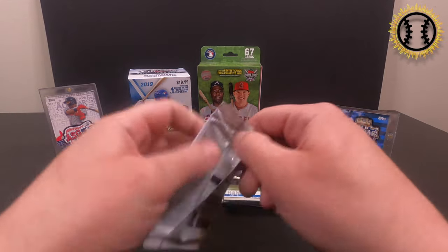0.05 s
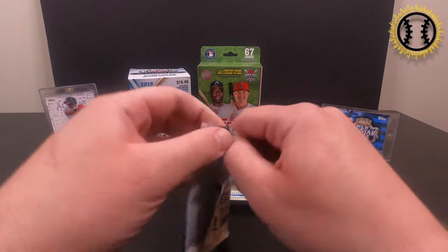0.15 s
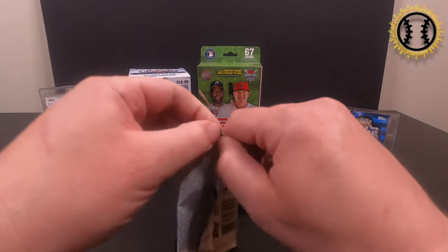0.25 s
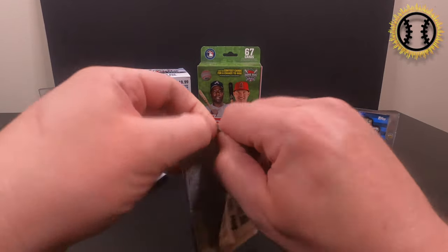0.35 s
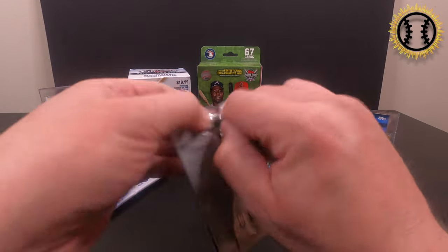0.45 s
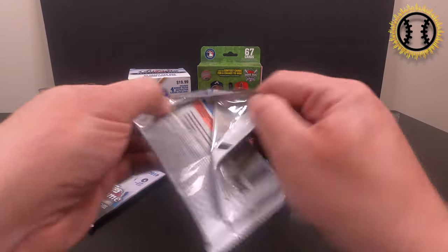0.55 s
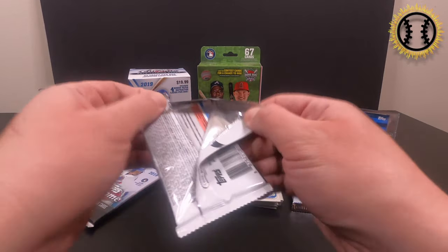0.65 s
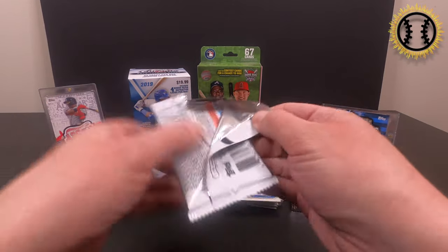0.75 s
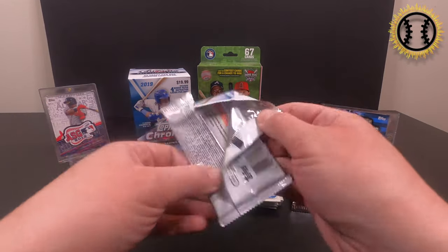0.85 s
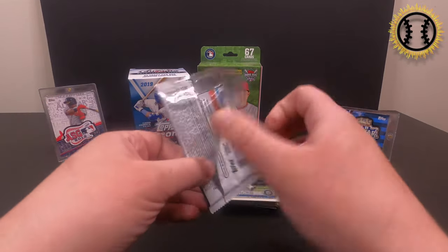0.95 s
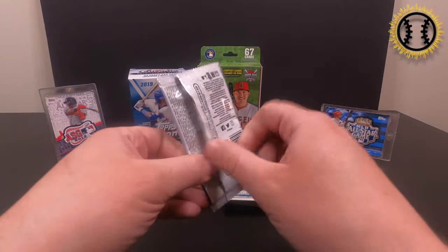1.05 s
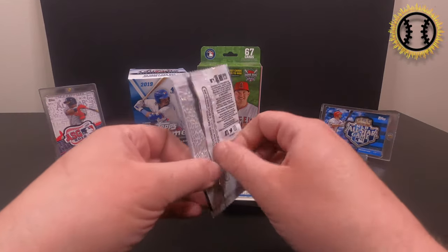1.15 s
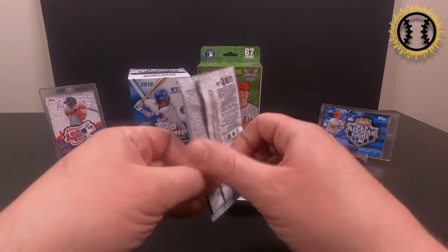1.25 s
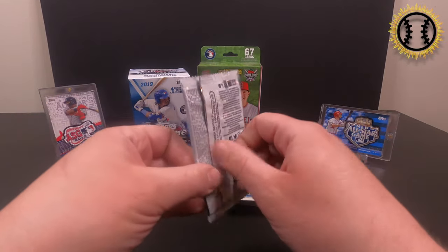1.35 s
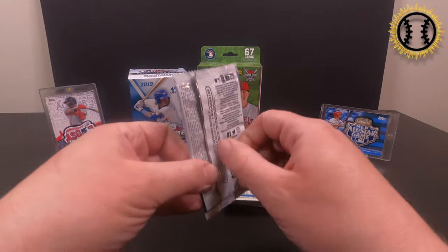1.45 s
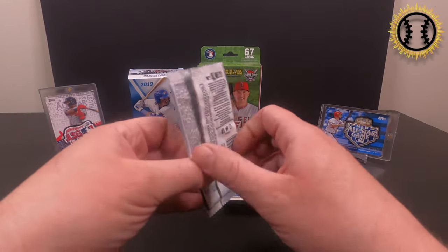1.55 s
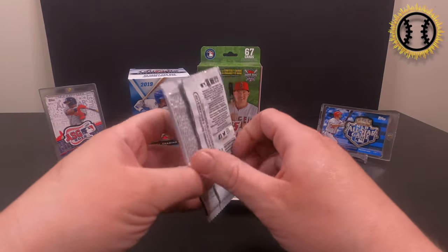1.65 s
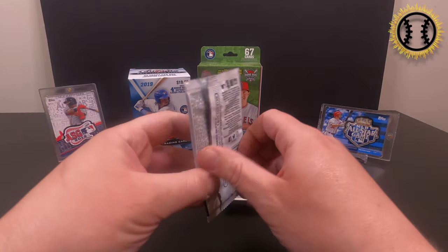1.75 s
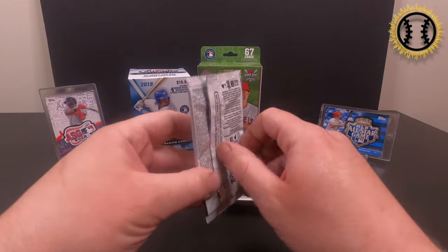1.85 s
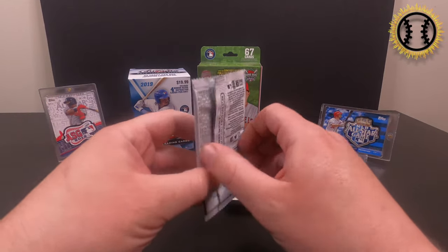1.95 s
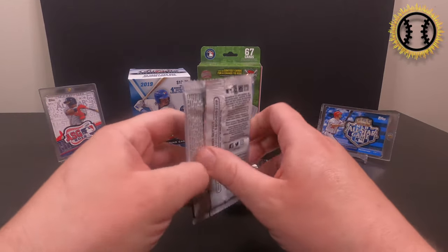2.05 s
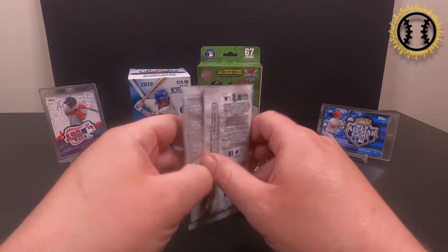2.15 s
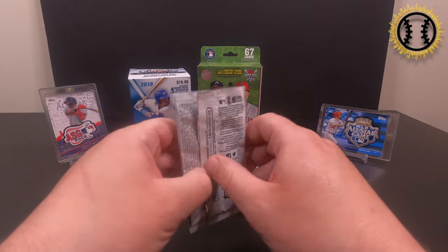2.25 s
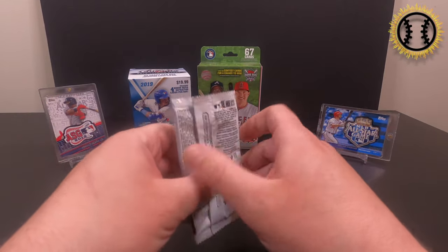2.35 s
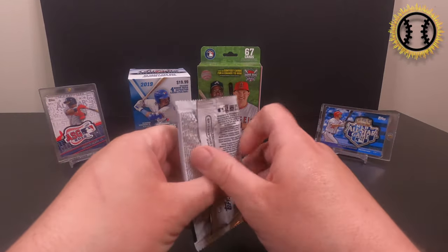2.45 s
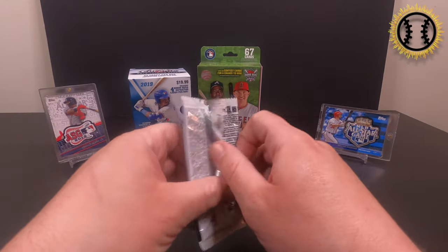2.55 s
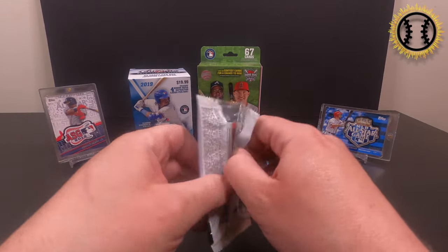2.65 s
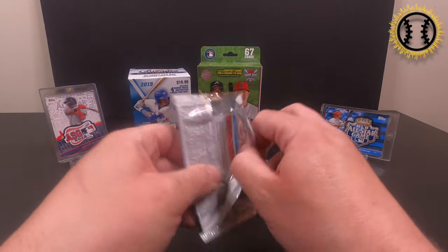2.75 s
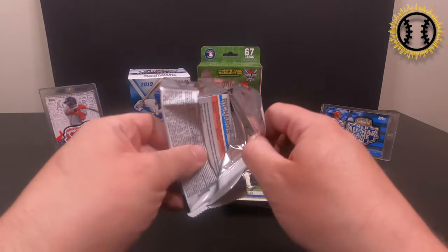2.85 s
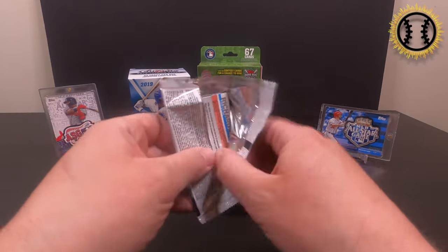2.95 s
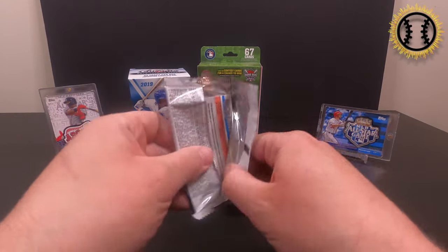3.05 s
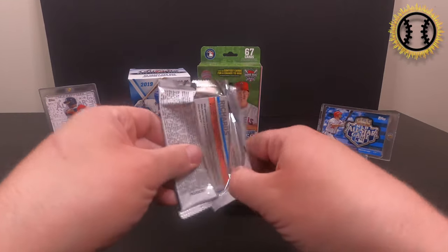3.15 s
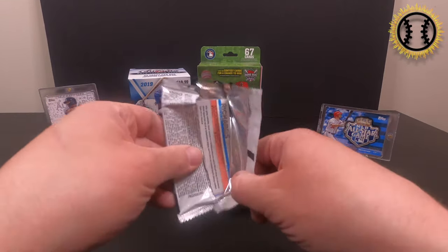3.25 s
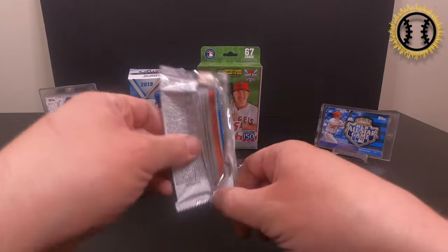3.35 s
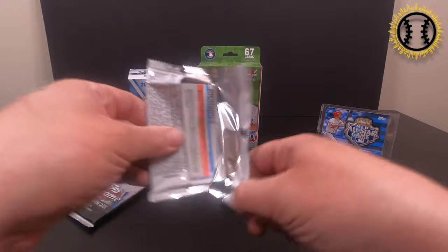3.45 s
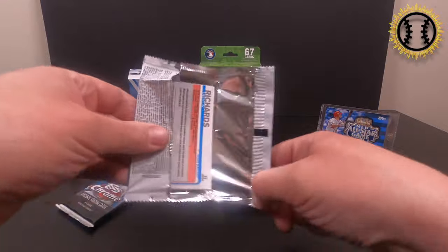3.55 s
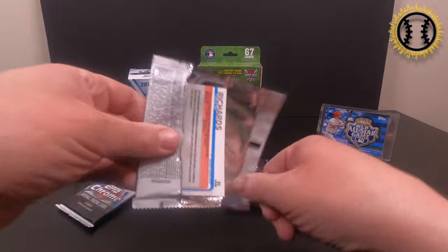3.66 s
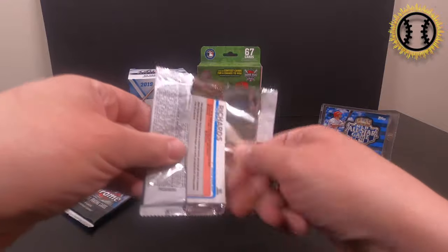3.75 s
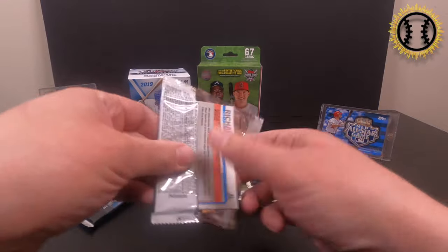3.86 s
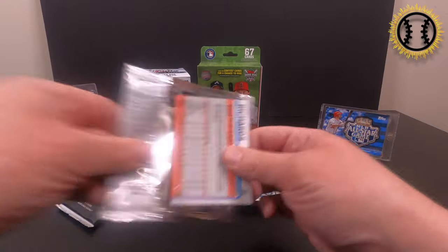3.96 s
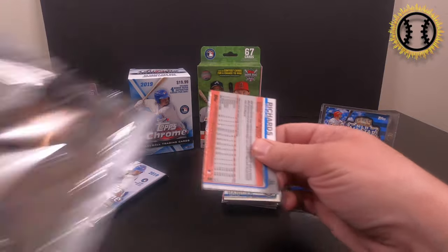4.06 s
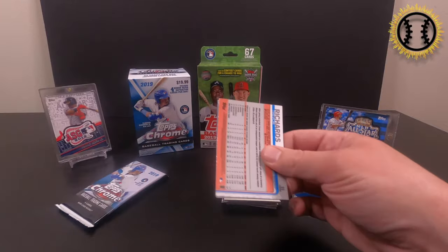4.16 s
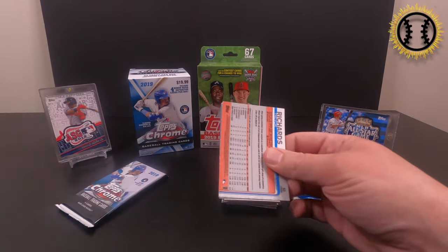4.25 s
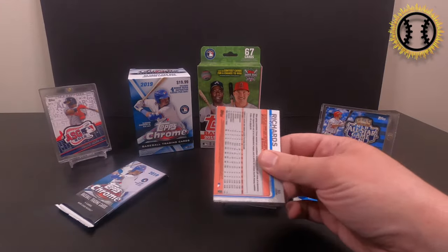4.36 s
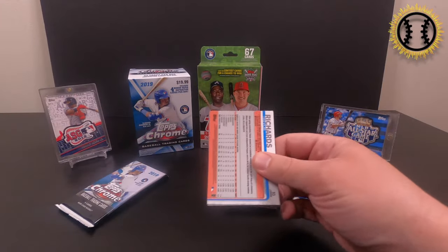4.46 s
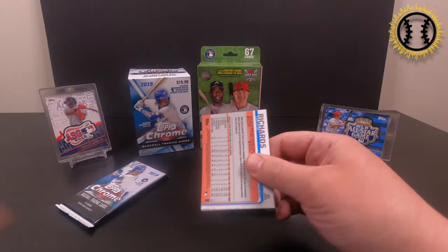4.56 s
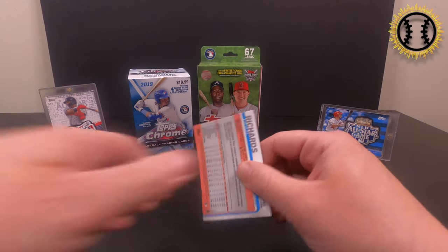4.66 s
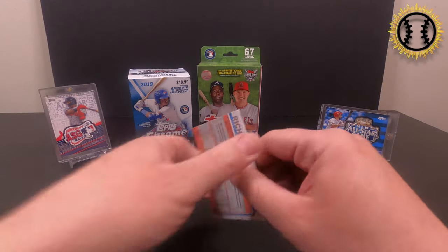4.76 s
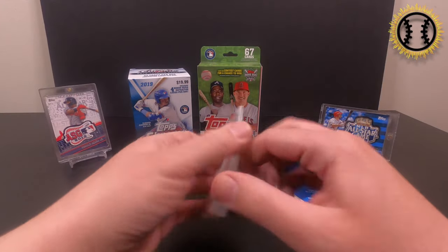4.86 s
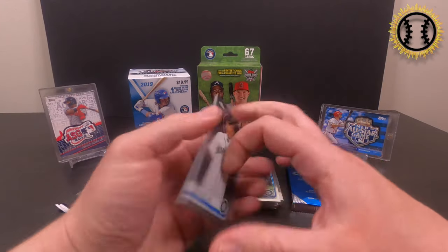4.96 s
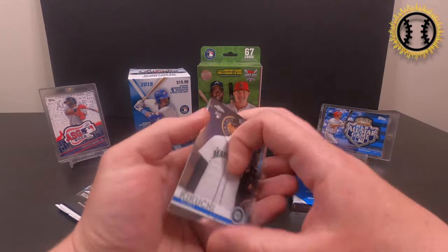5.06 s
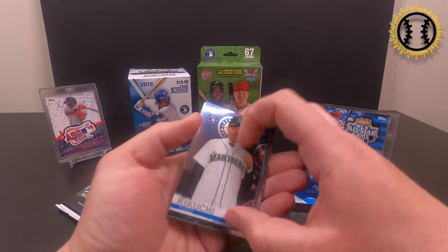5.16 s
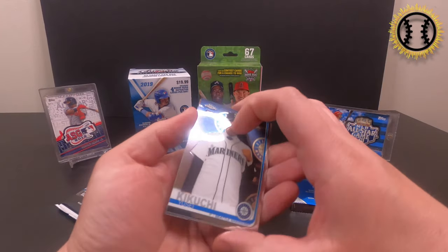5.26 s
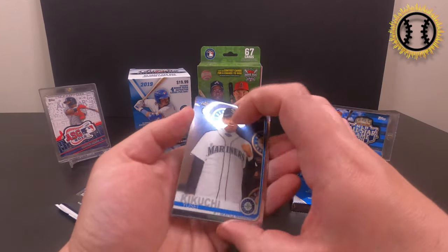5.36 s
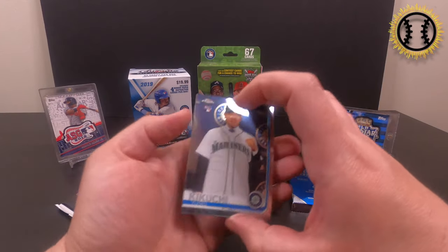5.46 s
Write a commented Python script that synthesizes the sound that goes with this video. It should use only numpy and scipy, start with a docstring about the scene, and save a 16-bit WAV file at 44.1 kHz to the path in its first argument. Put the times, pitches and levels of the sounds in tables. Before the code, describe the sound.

Hands open a foil packet close to the microphone in a small, quiet room with a very short tail and faint steady air noise. From the first instant there are hard, bright foil snaps over fine crackle, thickening at about 0.5 to 0.66 seconds into a short, narrow rasping rip that ends on a strong snap. From 0.75 to 2 seconds only lighter, scattered crinkles and ticks remain, thinning out near 1.5 to 1.9. Crackling gathers again after 2.1 and is dense and loud from about 2.6 to 3.75, crisp snaps mixed with sheet rustle and dull low knocks on the table, the heaviest near 3.6. A few sharp crinkles around 4 and soft thuds near 4.2 follow as the wrapper comes away. Small taps come between 4.4 and 5; after that, very faint smooth card rubbing and tiny ticks until the end at roughly 5.5.

```python
"""Sharp foil snaps over a bed of tiny crackles: two hands tear open a wrapper close to the microphone,
crumple it, pull it off a stack of cards and square the stack; fingers and cards thud on a table top.
Snaps are short noise bursts with ringing sines, crackle and rustle are random clicks in resonances,
the rip is slips in a narrow resonance, thuds are dying sines.
A small quiet room answers with a short tail, and faint air noise lies behind everything."""
import sys
import numpy as np
from scipy import signal
from scipy.fft import rfft, irfft
from scipy.io import wavfile
from scipy.ndimage import uniform_filter1d

SR = 44100
rng = np.random.default_rng(int(sys.argv[2]) if len(sys.argv) > 2 else 0)


def wav_record(signal):
    """Record a signal, one row per channel, as 16-bit PCM in the file named by sys.argv[1]."""
    frames = np.transpose(np.atleast_2d(signal))
    bounded = np.clip(frames, -1, 1)
    # unit amplitude maps onto the largest positive 16-bit level
    quanta = np.round(bounded * 32767).astype(np.int16)
    wavfile.write(sys.argv[1], SR, quanta)


N = 242991   # samples, about 5.5 s
CARDS_FROM_S = 4.86   # from here on the cards are free of the wrapper

# creases buckling in the foil: start_s, crack_db, bite_db, sheet_db,
# facet_hz (ring of the freed facet), sheet_hz (ring of the sheet)
SNAPS = [(0.0116, 0.5, -10.5, -19, 8020, 2820), (0.0296, -12, -8.5, -23.5, 5100, 2970),
         (0.0383, -6, -21, -32, 10650, 1490), (0.0469, -14.5, -20, -24.5, 8120, 1160),
         (0.0628, -22.5, -25, -29.5, 8840, 1360), (0.1016, -19, -17, -24, 7810, 1520),
         (0.1188, -3.5, -15.5, -27, 7830, 1500), (0.1405, -13, -13, -30, 10900, 2040),
         (0.172, -13.5, -15.5, -31, 8100, 1660), (0.2214, -15, -32, -21.5, 7800, 2130),
         (0.2504, -21, -18.5, -29, 8160, 1430), (0.2687, -13, -22, -31.5, 11800, 1580),
         (0.301, -10.5, -19, -17, 11000, 1510), (0.305, -8, -18, -29.5, 11700, 1500),
         (0.3139, -12.5, -16, -19, 7840, 2010), (0.3367, -24, -19, -35.5, 7220, 1520),
         (0.3862, -18, -35.5, -24, 8970, 1600), (0.4064, -14, -28, -34.5, 10100, 1590),
         (0.4407, -9, -24.5, -24, 9070, 2100), (0.4734, -14.5, -31, -32.5, 9400, 1990),
         (0.4815, -9, -22.5, -26.5, 9900, 1630), (0.4909, -13.5, -26, -25, 10900, 1230),
         (0.5043, -13.5, -26.5, -32.5, 6900, 2760), (0.5255, -5.5, -30, -33, 9240, 1560),
         (0.5365, -3.5, -28.5, -37, 11800, 1490), (0.544, -8, -12.5, -26.5, 6450, 1300),
         (0.5563, -6, -18.5, -13.5, 7600, 1500), (0.566, -11.5, -25, -22, 7960, 1340),
         (0.5778, -11.5, -22, -16.5, 9210, 1340), (0.5899, -8, -23, -17.5, 7880, 1370),
         (0.5977, -5, -32, -16.5, 9800, 1360), (0.6045, -9.5, -21.5, -14, 7700, 1312),
         (0.632, -1.5, -16, -12, 8200, 1560), (0.6388, -10.5, -21, -25, 8750, 1150),
         (0.6605, 0.5, -9.5, -15.5, 6700, 2630), (0.7624, -35, -45, -39, 10200, 1150),
         (0.806, -26, -38, -28.5, 6660, 1270), (0.8368, -18.5, -25, -37, 8550, 3100),
         (0.857, -16.5, -44, -53, 10200, 1380), (0.8754, -18, -27.5, -32.5, 8400, 1920),
         (0.9412, -20, -19.5, -25.5, 8060, 2700), (0.973, -13, -39, -38, 7650, 1820),
         (0.9837, -15.5, -23, -35, 8870, 1370), (0.9938, -14, -27, -29, 7700, 1980),
         (1.0283, -38, -36, -32, 9080, 3000), (1.0422, -35, -26, -25.5, 5570, 1020),
         (1.049, -15.5, -21, -26, 7850, 1170), (1.0574, -23, -32, -39, 5530, 2180),
         (1.0827, -16.5, -32, -49, 6440, 2190), (1.1068, -22.5, -42, -55, 8120, 1910),
         (1.1367, -18.5, -27.5, -45, 11300, 1040), (1.2106, -15, -39, -42, 8900, 1900),
         (1.2507, -22, -29.5, -49, 8020, 1290), (1.287, -51, -31.5, -32.5, 5160, 1800),
         (1.3094, -40, -45, -44, 9500, 1850), (1.4027, -21.5, -36, -35, 8760, 1000),
         (1.4253, -19, -42, -34.5, 8980, 2290), (1.4459, -12.5, -30, -31, 7220, 1050),
         (1.5098, -42, -40, -40, 5440, 2170), (1.5404, -55, -63.5, -46, 7160, 1600),
         (1.5905, -28, -53, -76, 5860, 1450), (1.6395, -29, -33, -39, 7700, 1840),
         (1.71, -42, -45, -44, 7520, 1860), (1.7494, -70, -63, -49, 5130, 2210),
         (1.8274, -42.5, -33, -32.5, 7880, 1780), (1.835, -23, -38, -47, 7900, 1630),
         (1.8664, -21.5, -52, -39, 7960, 1670), (1.957, -20, -37, -40.5, 6940, 2690),
         (2.0177, -21.5, -51, -47, 9900, 1750), (2.0408, -21, -49, -35.5, 9100, 1070),
         (2.0835, -16.5, -37, -29.5, 9400, 1530), (2.0943, -9, -38, -29, 8100, 2430),
         (2.0997, -14, -25, -20.5, 7600, 1320), (2.165, -22.5, -32.5, -34.5, 9300, 1380),
         (2.2194, -32, -23.5, -54, 6160, 2970), (2.2406, -15, -22, -26, 6300, 1490),
         (2.2677, -30, -41, -26, 8090, 1860), (2.3384, -34, -38, -41, 7600, 2190),
         (2.362, -16, -11.5, -27.5, 5620, 2980), (2.379, -16, -20, -41, 6800, 2900),
         (2.4086, -15.5, -18, -28.5, 5440, 1320), (2.42, -15, -11, -25, 5600, 1930),
         (2.4916, -25, -25, -36.5, 5200, 1855), (2.501, -27, -26, -27.5, 5360, 1470),
         (2.5368, -12.5, -21.5, -34, 9600, 3000), (2.5501, -15, -17.5, -26, 8110, 2080),
         (2.5764, -13, -17.5, -19, 5100, 1460), (2.6221, -27.5, -31, -23, 7800, 1090),
         (2.6362, -13.5, -25, -32.5, 7660, 1854), (2.6412, -13, -18.5, -13.5, 7000, 2370),
         (2.6561, -12.5, -8.5, -22, 6600, 2680), (2.6788, -9, -16.5, -14.5, 5800, 1840),
         (2.7108, -9, -7, -11.5, 7300, 2280), (2.7344, -19.5, -21, -29.5, 5700, 2230),
         (2.7454, -8.5, -9.5, -20.5, 7750, 2380), (2.7612, -7.5, -17, -13.5, 7350, 2360),
         (2.7799, -11.5, -22.5, -16.5, 7510, 2190), (2.7952, -22.5, -16, -25.5, 7070, 1370),
         (2.8285, -22, -24, -23, 7900, 1244), (2.8398, -13, -7, -12, 5440, 1970),
         (2.8664, -21, -29, -21.5, 7850, 1860), (2.8825, -17, -19.5, -15, 6840, 1010),
         (2.8943, -15.5, -28, -22, 6660, 1260), (2.9334, -13.5, -28, -22.5, 9750, 1420),
         (2.9606, -19, -27.5, -17, 7700, 1390), (2.9811, -6.5, -28.5, -21.5, 8100, 1530),
         (2.9961, -4, -29, -20, 8940, 1530), (3.0133, -11, -19.5, -19.5, 7750, 2040),
         (3.0234, -16.5, -29, -26.5, 7880, 2270), (3.0764, -25, -32, -30, 11800, 1370),
         (3.1009, -10.5, -17, -20.5, 10170, 1200), (3.1238, -7.5, -13.5, -9.5, 7400, 1880),
         (3.14, -11, -16.5, -21, 9780, 1770), (3.1902, -11.5, -28.5, -31, 10500, 2200),
         (3.2008, -14.5, -24, -29, 11300, 1970), (3.2181, -9, -28.5, -30, 8300, 1690),
         (3.2292, -6, -29, -22, 11500, 1470), (3.2383, -2.5, -14, -11, 9000, 1770),
         (3.2551, -10, -31, -29, 9200, 1660), (3.3079, -17.5, -32, -37.5, 10800, 1730),
         (3.315, -19, -21, -29, 9080, 2850), (3.3603, -14, -34.5, -36, 7500, 1530),
         (3.384, -9, -26, -29.5, 8160, 1730), (3.3942, -19, -21.5, -16.5, 8050, 1090),
         (3.4144, -10.5, -17.5, -37, 10300, 1608), (3.4537, -15, -29.5, -31.5, 8900, 1560),
         (3.463, -9.5, -17.5, -31, 8170, 1350), (3.4778, -15, -29, -38, 8690, 1550),
         (3.4984, -8, -20, -18.5, 7400, 1310), (3.5076, -8, -15, -17, 6850, 1640),
         (3.5156, -17, -22, -9, 6700, 980), (3.5343, -9, -21, -22.5, 9540, 1566),
         (3.5531, -14.5, -16, -17.5, 7120, 1540), (3.5644, -5, -24.5, -21.5, 11200, 2113),
         (3.5835, -5, -18, -8.5, 9100, 1485), (3.6148, -4.5, -8.5, -8.5, 10200, 1250),
         (3.6307, -9.5, -11.5, -13.5, 11000, 1590), (3.674, -15, -30, -21, 8680, 1550),
         (3.6878, -11, -37, -19, 8750, 1320), (3.7001, -13, -34, -19, 11100, 1390),
         (3.7186, -10, -14, -20, 8600, 1396), (3.7564, -16, -39, -32, 8400, 1020),
         (3.8263, -16.5, -40, -31, 7400, 1760), (3.885, -34, -40, -46, 8300, 1230),
         (3.906, -17.5, -25.5, -32.5, 10000, 1040), (3.9556, -18, -17.5, -17, 8500, 1980),
         (4.0127, -13, -15, -18, 8200, 1280), (4.0441, -12.5, -11.5, -17, 10100, 1370),
         (4.1064, -40, -32, -32, 7700, 1250), (4.1182, -22, -26, -34, 5560, 3030),
         (4.1247, -21, -23, -27.5, 8460, 1050), (4.1943, -45, -37, -25, 5660, 920),
         (4.264, -48, -41, -41, 8200, 2680), (4.2757, -36, -39, -53, 10000, 1730),
         (4.3346, -43, -33, -38, 5940, 1920), (4.373, -20, -27, -39, 8750, 1600),
         (4.5503, -19.5, -25, -41, 7400, 1770), (4.6688, -48, -35, -40.5, 4860, 2080),
         (4.683, -34, -39, -33, 6300, 2250), (4.6964, -28, -31, -48, 8500, 2700),
         (4.7112, -21, -19, -33, 8200, 2630), (4.814, -49, -60, -43.5, 9930, 999),
         (4.8754, -62, -48.5, -57, 4800, 1900), (4.9061, -42, -49, -33, 11400, 1150),
         (4.9532, -43, -46, -56, 9320, 1660), (4.9993, -40, -37.5, -41, 8660, 2080),
         (5.034, -38.5, -49, -38.5, 10500, 1990), (5.0948, -46, -48, -55, 5660, 1745)]
# layers of one snap, in the order crack, bite, sheet, pouch: low_hz, high_hz, t60_s
SNAP_LAYERS = [(6280, 13500, 0.0092), (2800, 7330, 0.01), (940, 2460, 0.0099), (250, 790, 0.0073)]
SNAP_RISE_S = 0.00021   # time constant of a snap's onset
FACET_SHARE, BITE_SHARE, SHEET_SHARE = 0.75, 0.34, 0.75   # part of a layer's power given to its ring
FACET_T60_S, SHEET_T60_S = 0.0061, 0.015
POUCH_DB, POUCH_FOLLOWS = -5, 0.9   # level over the sheet; dB gained per dB of finger weight


def snaps():
    """Each buckling crease is a noise burst of a few ms in four bands; facet, bite and sheet ring in it."""
    times, crack_db, bite_db, sheet_db, facet_hz, sheet_hz = np.transpose(SNAPS)
    fingers_db, _ = grip(times)
    pouch_db = sheet_db + POUCH_DB + POUCH_FOLLOWS * fingers_db   # firmer fingers, louder pouch
    levels_db = [crack_db, bite_db, sheet_db, pouch_db]
    size = 2048
    t = np.arange(size) / SR
    rise = 1 - np.exp(-t / SNAP_RISE_S)
    bite_hz = rng.uniform(*SNAP_LAYERS[1][:2], len(times))   # each bite rings at a random pitch within its band
    rings = {0: (facet_hz, FACET_SHARE, FACET_T60_S),
             1: (bite_hz, BITE_SHARE, FACET_T60_S),
             2: (sheet_hz, SHEET_SHARE, SHEET_T60_S)}
    sounds = 0
    for k, ((low_hz, high_hz, t60), level_db) in enumerate(zip(SNAP_LAYERS, levels_db)):
        noise = rng.standard_normal((len(times), size)) * rise * dying(t60, size)
        burst = band(band(noise, low_hz, high_hz), low_hz, high_hz)
        # the loudest 1.5 ms (3 ms in the two low layers) gets the power of a sine of peak 1
        power = uniform_filter1d(burst ** 2, size=66 * (k // 2 + 1), axis=1)
        burst = burst / np.sqrt(2 * power.max(axis=1, keepdims=True))
        if k in rings:
            hz, share, ring_t60 = rings[k]
            ring = np.sin(2 * np.pi * np.outer(hz, t)) * rise * dying(ring_t60, size)
            burst = np.sqrt(1 - share) * burst + np.sqrt(2 * share) * ring
        sounds = sounds + from_db(level_db)[:, None] * burst
    out = np.zeros(N)
    add(out, times, sounds)
    return out


# the hold on the wrapper: at_s, fingers_db (fingers on the pack over the rustle), sheet_hz (ring of the sheet)
GRIP = [(0, -16, 1400), (.5, -25.5, 1550), (.6, -12.5, 1350), (.68, -12.5, 1500), (1.5, -9.5, 1400),
        (1.9, -16.5, 1750), (2.3, -4, 1500), (2.7, -17, 2050), (2.9, -9.5, 1400), (3.4, -13, 1650),
        (3.6, -7, 1100), (4.0, -6, 1250), (4.3, -8.5, 1900), (4.6, 5, 1100), (4.75, 5, 2100),
        (4.9, -19, 1150), (5.1, -2, 1950), (5.5, 1.5, 1050)]


def grip(s):
    """The hold drifts between points: weight of the fingers (dB) and ring of the sheet (Hz) at the given times."""
    at, fingers_db, sheet_hz = np.transpose(GRIP)
    return np.interp(s, at, fingers_db), np.interp(s, at, sheet_hz)


RIP_FROM_S, RIP_TO_S, RIP_DB = 0.553, 0.645, -30
RIP_HZ, RIP_WIDTH_HZ = 1450, 350


def rip():
    """The seam parts with a narrow rasp: rapid slips along it ring the taut sheet."""
    force = np.zeros(N)
    force[round(RIP_FROM_S * SR):round(RIP_TO_S * SR)] = from_db(RIP_DB)
    slips = rng.standard_normal(N) * (rng.random(N) < 900.0 / SR)   # 900 slips a second
    rasp = resonance(resonance(slips, RIP_HZ, RIP_WIDTH_HZ), RIP_HZ, RIP_WIDTH_HZ)
    return ease(force, 0.004) * rms_one(rasp)


# spectrum of the fine foil crackle: pitch_hz, level_db (per Hz)
CRACKLE_SPECTRUM = [(2800, -14), (3500, -11.5), (4300, 2), (5200, -6), (7700, 1.5), (10000, -0.5),
                    (12500, -6.5), (15500, -11)]
CARD_TOP_HZ = 13100


def crackle():
    """Countless small creases click; once the cards are free, smooth card rubs on card with steady friction."""
    fine = grains(CRACKLE_SPECTRUM, per_s=5000, spread_db=1.5, cycles=34.0, clump_db=2.5, patch_db=2.5, count=16)
    first = round(CARDS_FROM_S * SR)
    rubbing = rng.standard_normal(N - first)
    sliding = from_db(1) * rubbing + card_stack(rubbing)
    fine[first:] = rms_one(band(sliding, 1500, CARD_TOP_HZ))
    return fine


# spectrum of the flexing sheet: pitch_hz, level_db (per Hz)
RUSTLE_SPECTRUM = [(800, -7), (1100, -4.5), (1500, 1), (2100, -8), (3000, -0.5)]
SHEET_WIDTH_HZ, SHEET_RING_DB = 530, -10.5


def rustle():
    """The whole sheet flexes in larger clicks, and the grip at each squeeze sets the pitch it rings at."""
    flexing = grains(RUSTLE_SPECTRUM, per_s=2600, spread_db=3.5, cycles=8.1, clump_db=4.0, patch_db=4.0, count=9)
    starts = [round(row[0] * SR) for row in HANDLING] + [N]
    sheet = np.zeros(N)
    for (s, length, *_), i, until in zip(HANDLING, starts, starts[1:]):
        _, sheet_hz = grip(s + length / 2)
        ring = rms_one(resonance(flexing[i:i + SR], sheet_hz, SHEET_WIDTH_HZ))
        sheet[i:until] = ring[:until - i]   # each pitch holds until the next squeeze
    return rms_one(flexing + from_db(SHEET_RING_DB) * sheet)


# spectrum of skin rubbing the pack: pitch_hz, level_db (per Hz)
FINGER_SPECTRUM = [(70, -13.5), (120, -9), (170, -6.5), (270, 6.5), (380, 2.5), (500, -2), (700, 6.5),
                   (950, -5)]


def fingers():
    """Skin rubbing the pack: dense low clicks in short resonances, with little clumping."""
    return grains(FINGER_SPECTRUM, per_s=2500, spread_db=2.5, cycles=10.0, clump_db=1.0, patch_db=0.5, count=12)


# squeezes of the hands: start_s, length_s, crackle_db, rustle_db (over the crackle)
HANDLING = [(0, 0.067, -27.5, -2), (0.071, 0.082, -33, -4.5), (0.168, 0.056, -29.5, -5.5),
            (0.242, 0.069, -48.5, 9), (0.295, .05, -27.5, -8.5), (0.348, .033, -32, -16.5),
            (.402, .045, -33.5, -29), (0.471, 0.021, -27.5, -13.5), (0.522, 0.078, -23, -11),
            (0.597, 0.04, -21, -8), (0.641, 0.045, -37.5, -8), (0.782, .035, -52, 7.5),
            (0.83, 0.069, -41.5, -8.5), (0.937, 0.018, -32, -11), (0.968, 0.032, -33.5, -3.5),
            (1.015, 0.014, -50, -7), (1.031, 0.027, -34.5, -4.5), (1.071, 0.028, -43, -12),
            (1.132, 0.042, -44, -2), (1.165, 0.033, -29, -7.5), (1.22, 0.03, -56, 0),
            (1.282, 0.011, -62, 20.5), (1.314, 0.031, -43, -12), (1.419, 0.042, -34, -9.5),
            (1.5, 0.026, -59, 2), (1.585, 0.059, -59, -26), (1.634, 0.032, -47, -19.5),
            (1.669, 0.064, -61, 1), (1.8, .03, -55.5, -9), (1.84, 0.067, -39, -9), (1.93, 0.072, -51, -15),
            (1.996, 0.11, -37.5, -13), (2.083, 0.015, -33, -6.5), (2.125, 0.082, -50, -17),
            (2.225, 0.051, -37, -4), (2.339, 0.041, -39.5, 1.5), (2.379, 0.094, -44.5, -3.5),
            (2.497, .03, -41, -8), (2.513, 0.083, -34, -6.5), (2.63, 0.086, -27, -8), (2.733, .05, -23, -9),
            (2.79, .04, -30, -3), (2.846, 0.09, -25.5, -5), (2.936, .03, -35, -4.5),
            (2.978, 0.046, -24.5, -5.5), (3.026, .035, -39, -5.5), (3.078, 0.083, -33, -3.5),
            (3.165, .045, -30.5, -7.5), (3.216, .04, -25, -5), (3.274, 0.089, -39, -5),
            (3.369, 0.093, -35.5, 3), (3.459, .04, -26.5, -10.5), (3.498, .075, -25.5, -4.5),
            (3.576, 0.053, -21, -1), (3.64, 0.045, -37, -4.5), (3.689, .07, -27, -6.5),
            (3.79, 0.052, -49.5, 5.5), (3.881, 0.051, -37.5, -6), (3.95, 0.049, -45.5, 2.5),
            (4.006, 0.039, -30.5, -2), (4.073, 0.062, -53.5, 8.5), (4.257, 0.03, -54, -15),
            (4.288, 0.034, -42, -8.5), (4.342, 0.05, -39.5, -18), (4.535, 0.047, -44.5, -10),
            (4.587, .03, -60, -5), (4.667, 0.043, -49, -7), (4.7, 0.023, -40.5, -9), (4.74, .05, -59.5, -6),
            (4.813, .06, -69, -1), (4.887, 0.05, -52, 0.5), (4.995, 0.043, -57.5, 3.5),
            (5.089, 0.008, -48, -19), (5.16, 0.042, -62.5, -6), (5.223, 0.05, -53.5, -23.5),
            (5.45, 0.054, -69.5, -5)]
# the pack dragging over the table, heard in the finger layer: start_s, length_s, level_db
DRAGS = [(0.593, .05, -35), (2.887, 0.058, -36.5), (3.579, .053, -25), (4.168, .05, -37.5),
         (4.219, 0.044, -48), (4.433, 0.063, -57.5), (4.807, 0.08, -64), (5.386, 0.11, -68)]
STROKE_EASE_S, CARD_EASE_S, RELEASE_S = 0.0025, 0.0048, 0.0074   # time constants


def handling():
    """Under and around the snaps: squeezes of the hands set how loud the crackle, rustle and fingers are."""
    force = np.zeros((3, N))
    for s, length, crackle_db, rustle_db in HANDLING:
        fingers_db, _ = grip(s + length / 2)
        i = round(s * SR)
        layers_db = crackle_db + np.cumsum([0, rustle_db, fingers_db])   # each layer relative to the one before
        force[:, i:i + round(length * SR)] = from_db(layers_db)[:, None]
    for s, length, db in DRAGS:
        force[2, round(s * SR):round((s + length) * SR)] = from_db(db)
    before_cards = np.arange(N) < round(CARDS_FROM_S * SR)
    force = np.where(before_cards, ease(force, STROKE_EASE_S), ease(force, CARD_EASE_S))
    force = np.maximum(force, ease(force, RELEASE_S))   # the layers go on settling after a squeeze
    return np.sum(force * [crackle(), rustle(), fingers()], axis=0)


# resonances of the stack of cards: pitch_hz, width_hz, level_db
CARD_MODES = [(1952, 110, 6), (4040, 870, 6.5), (5530, 300, -13), (7800, 390, 0), (9630, 430, 1),
              (10570, 550, 4.5), (12300, 630, 6)]


def card_stack(x):
    """The stack of cards rings in parallel modes when it is rubbed or tapped."""
    return modes(x, CARD_MODES)


# dull knocks of fingers, pack and cards: start_s, level_db, pitch_hz
THUDS = [(.638, -40.5, 283), (0.66, -28, 250), (1.188, -48, 313), (1.421, -39, 157), (1.511, -40, 400),
         (1.9, -52, 137), (2.1, -35, 277), (2.249, -44, 147), (2.366, -33, 312), (2.748, -29.5, 304),
         (2.876, -23.5, 317), (3.026, -32.5, 100), (3.398, -30.5, 258), (3.515, -27, 450),
         (3.585, -15.5, 290), (3.614, -34, 284), (3.718, -38, 109), (3.831, -36, 252), (3.956, -31, 180),
         (4.039, -32, 283), (4.115, -28.5, 214), (4.174, -28.5, 159), (4.198, -20.5, 220),
         (4.454, -40.5, 265), (4.55, -44, 300), (4.667, -37.5, 278), (4.708, -36, 296), (4.815, -32, 316),
         (4.999, -34.5, 241)]
THUD_T60_S = 0.045


def thuds():
    """A soft push that swings at a low pitch and dies within a few hundredths of a second."""
    t = np.arange(8192) / SR
    swings = [from_db(db) * np.sin(2 * np.pi * hz * t) * dying(THUD_T60_S, len(t)) for s, db, hz in THUDS]
    out = np.zeros(N)
    add(out, [s for s, db, hz in THUDS], swings)
    return out


# resonances of the table top under the hands: pitch_hz, width_hz, level_db
TABLE_MODES = [(120, 17, -5.5), (276, 18, -7), (470, 25, -6), (680, 30, 2.5)]


def table_top(x):
    """The table top under the hands rings in a few low modes."""
    return modes(x, TABLE_MODES)


# decay of the small room by band: low_hz, high_hz, t60_s
ROOM_DECAY = [(30, 2500, 0.11), (835, 6700, 0.2), (7000, 20000, 0.1)]
ROOM_DB = -13


def room(x):
    """Dense reflections from table and walls, starting after 3 ms; each band dies at its own rate."""
    size = SR // 2
    tail = np.zeros(size)
    for low_hz, high_hz, t60 in ROOM_DECAY:
        tail += band(rng.standard_normal(size), low_hz, high_hz) * dying(t60, size) / np.sqrt(t60)
    tail = tail / np.sqrt(np.sum(tail ** 2))
    return signal.fftconvolve(x, np.pad(tail, (130, 0)))[:N]


# spectrum of the room's air: pitch_hz, level_db (per Hz)
AIR_SPECTRUM = [(25, 0), (110, -0.5), (184, -5), (600, -6), (1040, -16), (1300, -20), (2000, -15.5),
                (3100, -22), (3800, -17.5), (7000, -22.5), (13000, -32), (16000, -47)]
AIR_DB = -67.5   # rms


def room_tone():
    """Steady faint air noise: white noise shaped by a spectrum."""
    hz = np.maximum(np.fft.rfftfreq(N, 1 / SR), 1)
    shaped = rfft(rng.standard_normal(N)) * from_db(level_at(AIR_SPECTRUM, hz))
    return from_db(AIR_DB) * rms_one(irfft(shaped, N))


def grains(spectrum, per_s, spread_db, cycles, clump_db, patch_db, count):
    """Random clicks in clumps, dealt to short resonances; each resonance comes and goes as facets form; rms 1."""
    sizes = from_db(spread_db * np.minimum(rng.exponential(1, N), 4)) * rng.choice([-1, 1], N)
    clicks = sizes * (rng.random(N) < per_s / SR) * from_db(clump_db * drift(52.0))
    dealt = rng.integers(0, count, N)
    out = np.zeros(N)
    for k, hz in enumerate(np.geomspace(spectrum[0][0], spectrum[-1][0], count)):
        share = clicks * (dealt == k) * from_db(patch_db * drift(22.0))
        rung = resonance(share + 1e-18, hz, 2.23 * hz / cycles)
        out += rms_one(rung) * from_db(level_at(spectrum, hz)) * np.sqrt(hz)   # higher resonances cover more Hz
    return rms_one(band(out, 0.68 * spectrum[0][0], 1.23 * spectrum[-1][0]))


def drift(rate):
    """Slow random wander of rms 1, faster at a higher rate; made at every 40th sample."""
    r = np.exp(-80 * np.pi * rate / SR)
    noise = rng.standard_normal(N // 40 + 2002)
    slow = signal.lfilter([1], [1, -2 * r, r * r], noise)[2000:]   # skip the filter's run-in
    return np.interp(np.arange(N) / 40, np.arange(len(slow)), rms_one(slow))


def resonance(x, hz, width_hz):
    """Two-pole resonance with a gain of about 1 at its peak."""
    r = np.exp(-np.pi * width_hz / SR)
    feedback = [1, -2 * r * np.cos(2 * np.pi * hz / SR), r * r]
    return signal.lfilter(np.array([1, 0, -1]) * (1 - r * r) / 2, feedback, x)


def modes(x, table):
    """Parallel resonances of a body."""
    return sum(from_db(db) * resonance(x, hz, width_hz) for hz, width_hz, db in table)


def ease(force, seconds):
    """Strokes swell and fade instead of switching."""
    r = np.exp(-1 / (seconds * SR))
    return signal.lfilter([1 - r], [1, -r], force + 1e-18)


def band(x, low_hz, high_hz):
    """Causal band-pass along time."""
    sos = signal.butter(2, [low_hz, min(high_hz, 0.45 * SR)], "band", fs=SR, output="sos")
    return signal.sosfilt(sos, x)


def level_at(points, hz):
    """Spectrum in dB read on a log-frequency axis."""
    at_hz, level_db = np.transpose(points)
    return np.interp(np.log(hz), np.log(at_hz), level_db)


def dying(t60, size):
    """Envelope that loses 60 dB in t60 seconds."""
    return from_db(-60 * np.arange(size) / SR / t60)


def from_db(db):
    """Gain of a level in dB."""
    return 10 ** (np.asarray(db) / 20)


def rms_one(x):
    """Scale to rms 1."""
    return x / np.sqrt(np.mean(x ** 2) + 1e-20)


def add(out, times, sounds):
    """Lay each short sound at its moment."""
    for s, sound in zip(times, sounds):
        i = round(s * SR)
        out[i:i + len(sound)] += sound[:N - i]


def scene():
    """One microphone close to the hands feeds both channels."""
    ticks = snaps()
    on_cards = np.arange(N) >= CARDS_FROM_S * SR   # late ticks are card edges and ring the stack
    card_ring = card_stack(ticks * on_cards) * from_db(2.5)
    close = ticks + card_ring + handling() + rip() + thuds()
    close = close + table_top(close)
    heard = close + from_db(ROOM_DB) * room(close) + room_tone()
    return np.tile(heard, (2, 1))


MIC_LOW_HZ, CUTOFF_HZ = 45, 16000


def record(dry):
    """The microphone drops the deepest bass, peaks beyond 0.9 clip, the top is cut."""
    bass_cut = signal.butter(2, MIC_LOW_HZ, "high", fs=SR, output="sos")
    top_cut = signal.cheby2(16, 85, CUTOFF_HZ + 500, fs=SR, output="sos")   # 85 dB down from 500 Hz above
    heard = signal.sosfilt(bass_cut, dry)
    return signal.sosfilt(top_cut, np.clip(heard, -0.9, 0.9))


dry = scene()
out = record(dry)
wav_record(out)
```